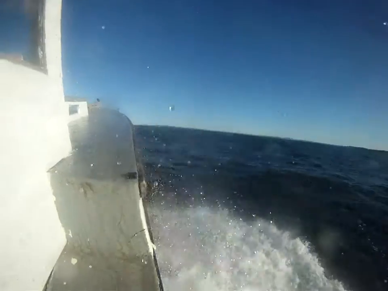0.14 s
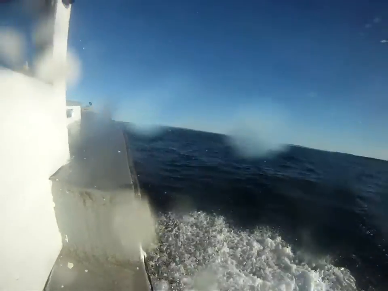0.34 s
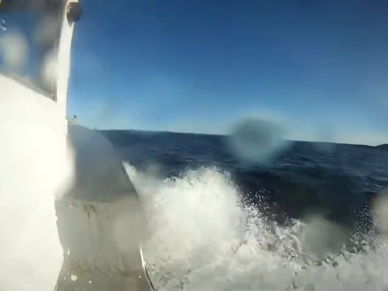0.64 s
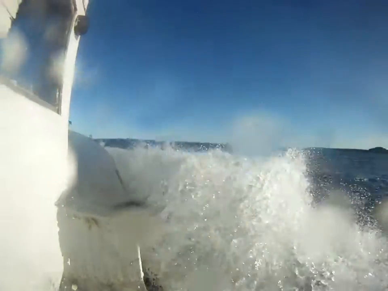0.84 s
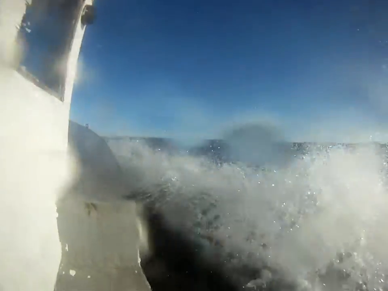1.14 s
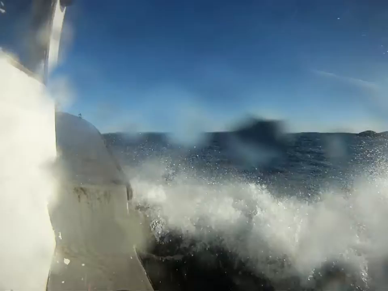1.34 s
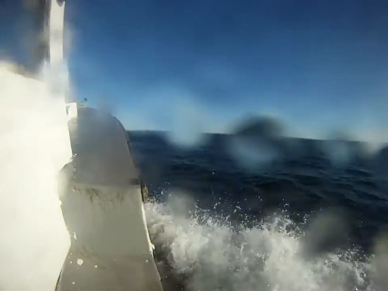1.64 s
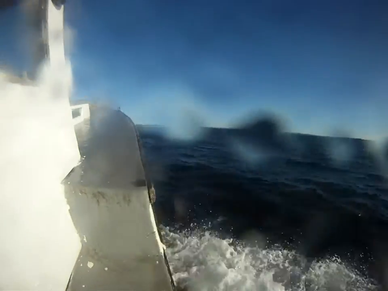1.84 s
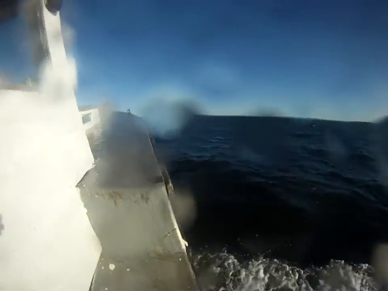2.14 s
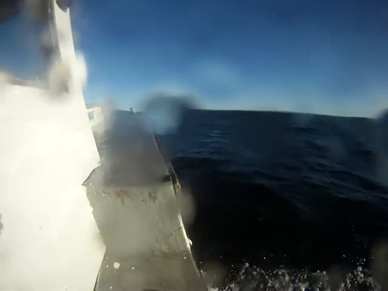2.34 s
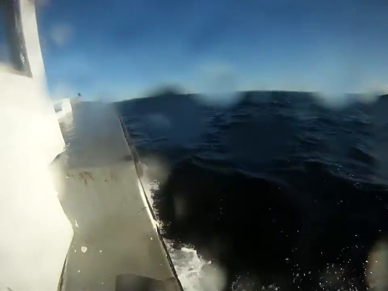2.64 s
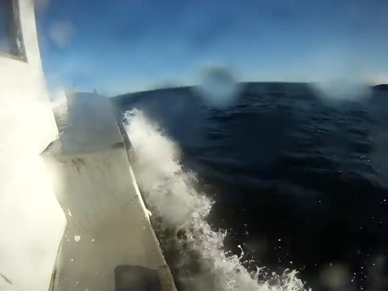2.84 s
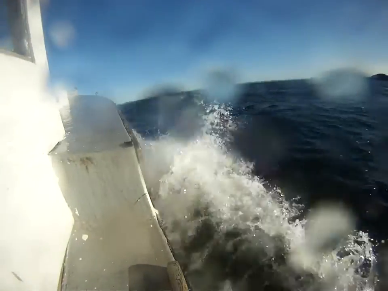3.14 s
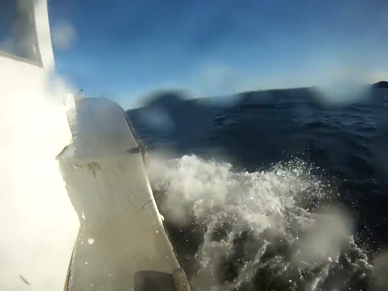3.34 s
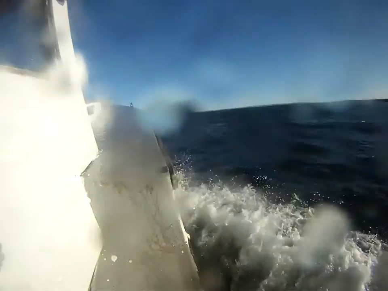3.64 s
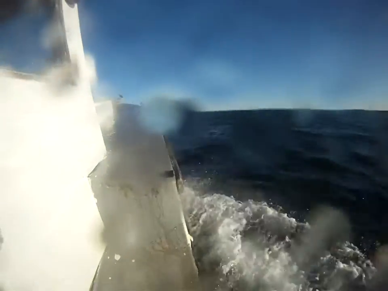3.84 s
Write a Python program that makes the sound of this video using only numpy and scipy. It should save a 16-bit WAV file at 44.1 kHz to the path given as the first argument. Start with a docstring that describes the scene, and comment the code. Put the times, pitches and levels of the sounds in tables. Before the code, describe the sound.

Water splashes from a speeding boat: loud sharp smacks at once, a lull, another hissing spray burst, then only foamy wash swelling twice. Steady engine drone beneath; muffled, boxy close microphone with gritty, harsh treble.

```python
"""Spray patters in bursts on the closed housing of a camera riding on the side of a fast motor boat.
Big drops smack the housing; it rings, rattles and thuds. Filtered noise is the wash rushing along the hull;
short rising tones are a thud under one smack, then gulps of closing air pockets. A diesel drones in sines
and clatters through the hull in repeating knocks, and wind thumps low. The camera samples slowly and holds
each sample, so everything is mirrored in the treble."""
import sys
import numpy as np
from scipy import signal
from scipy.fft import rfft, irfft, next_fast_len
from scipy.io import wavfile
from scipy.ndimage import map_coordinates

SR = 44100
rng = np.random.default_rng(int(sys.argv[2]) if len(sys.argv) > 2 else 0)


def dump_mix(stems):
    """Bounce the given channels to the path in sys.argv[1] as a 16-bit WAV at rate SR."""
    frames = np.atleast_2d(stems).T  # one column per channel
    limited = np.clip(frames, -1, 1)  # hard clip at full scale
    pcm = np.round(limited * 32767).astype(np.int16)
    wavfile.write(sys.argv[1], SR, pcm)


N = 176400  # length in samples

# Spray bursts. Each row: time in seconds, level in dB, share of single drops against steady hiss (0 to 1).
SPRAY_CURVE = [(0, -33, 0.5), (.06, -36, 0.65), (.09, -51, 0.2), (.2, -46, 0.3), (.215, -33, 0.3),
               (.27, -24.5, 0.24), (.34, -31.5, 0.9), (.375, -37.5, 0.5), (.42, -34, 0.3), (.58, -38, 0.9),
               (.64, -58, .3), (1.02, -42.5, 0.5), (1.1, -27, 0.15), (1.25, -25.5, 0.08),
               (1.33, -29.5, 0.4), (1.39, -37.5, 0.2), (1.4, -26, 0.14), (1.43, -30.5, 0.3),
               (1.437, -45, 1), (1.62, -45, 0.9), (1.7, -72, .3), (4, -80, .3)]
# Colour of drops heard in the housing. Each row: frequency in Hz, relative level in dB per Hz.
HOUSING_COLOUR = [(80, -44.5), (200, -12.5), (450, -16.5), (750, -13.5), (900, -8), (1050, -8.5),
                  (1270, -2.5), (1450, -10.5), (2020, 1), (2500, -0.5), (2900, -9.5), (3300, -12.5),
                  (3650, -6), (4200, -14), (4700, -11), (5950, -21.5), (7700, -39), (13000, -120)]
DROPS_PER_S, DROP_SPREAD_DB = 220, 0.5  # mean rate, mean of the random level added to each drop
DROP_RISE_S, DROP_FADE_S = 0.00031, 0.0017

# Wash along the hull. Each row: time in seconds, level of bass and middle in dB, level of treble in dB.
WASH_CURVE = [(0, -41, -41.5), (.5, -34.5, -51.5), (.8, -37.5, -50.5), (1.2, -39, -48), (1.65, -36.5, -47),
              (1.9, -42, -54.5), (2.2, -42.5, -59.5), (2.3, -37, -50), (2.48, -32, -42.5),
              (2.6, -37, -48.5), (2.8, -38, -53), (3.1, -38.5, -51.5), (3.26, -33.5, -44),
              (3.4, -37.5, -45.5), (3.62, -39, -51), (3.75, -40.5, -56), (4, -40, -58.5)]
# Colour of the wash. Each row: frequency in Hz, relative level in dB per Hz.
FOAM_COLOUR = [(290, -50.5), (500, -12), (590, -16), (719, -12.5), (814, -14.5), (884, -14), (981, -15.5),
               (1260, -3.5), (1480, -10), (2070, 1.5), (2540, -2), (2880, -15), (3100, -8.5), (4640, -17.5),
               (5360, -14.5), (5950, -25.5), (7740, -68), (13100, -120)]

CYCLE_HZ = 19.6  # one full firing cycle, before its slight drift
# Steady engine tones. Each row: multiple of the cycle, sine amplitude in dB before its wobble.
ENGINE_ORDERS = [(5, -59), (6, -49), (7, -60), (8, -56), (9, -51.5), (11, -52.5), (12, -53.5), (13, -56)]
WHINE_HZ, WHINE_DB = 317.3, -51  # pitch before the drift, sine amplitude before its wobble
# Firing tone. Each row: time in seconds, sine amplitude in dB before its wobble.
DRONE_CURVE = [(0, -52), (.3, -44), (.86, -39), (1.2, -48.5), (1.6, -43), (2.85, -44.5), (3.1, -48.5),
               (4, -44)]
# Colour of clatter and engine noise through the hull. Each row: frequency in Hz, relative level in dB per Hz.
HULL_COLOUR = [(210, -28), (350, -2), (438, -11), (476, -5), (505, -33), (536, -12), (756, -7.5),
               (893, -2.5), (1050, -5.5), (1470, -1), (1820, -8), (2420, -1.5), (2790, -12.5), (3140, -13),
               (4120, -35), (4860, -15.5), (5950, -35), (7740, -40), (13100, -120)]
CLATTER_DB, ENGINE_NOISE_DB = -53.5, -43
KNOCK_SPREAD_DB = -10.5  # scales the level offsets of the four knocks
# Hull panels ringing with the clatter. Each row: pitch in Hz, width in Hz, level in dB rms.
HULL_PANELS = [(1975, 50, -49), (3070, 130, -54.5), (863.5, 12, -55), (933, 21, -59)]
# Low rumble over time. Each row: time in seconds, level in dB before its wobble.
RUMBLE_CURVE = [(0.2, -60), (0.45, -41), (0.89, -47), (1.2, -44.5), (1.71, -47), (2.01, -54), (2.37, -48),
                (3.33, -48), (3.62, -47.5), (4.0, -51)]
# Colour of the low rumble. Each row: frequency in Hz, relative level in dB per Hz.
RUMBLE_COLOUR = [(15, -11), (25, 4.5), (86, 2.5), (156, -1.5), (322, -8.5), (361, -17), (500, -23),
                 (650, -66)]

# Wind buffeting. Each row: time in seconds, level of the low thumping in dB.
WIND_CURVE = [(0, -50), (.07, -48), (.25, -63), (.48, -56), (.53, -36), (.59, -36), (.64, -54),
              (1.2, -43.5), (1.42, -54), (1.6, -74), (2.9, -56), (3, -49), (3.15, -73), (3.5, -41.5),
              (3.7, -49), (4, -56)]
# Colour of the thumping. Each row: frequency in Hz, relative level in dB per Hz.
THUMP_COLOUR = [(22, 5.5), (50, -0.5), (90, -17), (200, -4), (400, -57)]

# Big drops. Each row: start in seconds, nominal peak in dB, length in seconds, mean ring pitch in Hz,
# treble in dB relative to the nominal level of the rattle.
BIG_DROPS = [(0.0039, -12.0, 0.0051, 1930.0, -5.5), (0.0076, 1, 0.0016, 1920, -19),
             (0.0282, -7.5, 0.0017, 2310.0, -18.0), (0.0327, 0, 0.0013, 2140, -20.0),
             (0.0384, -7, 0.0014, 2210, -7), (0.0675, 8.5, 0.0023, 2004, -19.5),
             (0.0744, -7.5, 0.0011, 1880.0, -26), (0.096, -23, 0.0016, 2380.0, -10.0),
             (0.1243, -4.5, 0.0016, 2200, -10), (0.1506, -14, 0.0016, 1200, -17.0),
             (0.1815, 4.5, 0.0024, 1918, -11.5), (0.21, -14.0, 0.0014, 2370, -19.0),
             (0.2162, -20, 0.0018, 2400, -11.0), (0.2194, -19.0, 0.0024, 2200.0, -8.0),
             (0.2332, -11, 0.0022, 2270, -9), (0.2364, -10.5, 0.0015, 2260, -20.0),
             (0.2527, -17, 0.0048, 2170, -3), (0.263, -14.0, 0.0014, 2210, -7),
             (0.271, -14.0, 0.0016, 2190.0, -21.0), (0.2783, -13.0, 0.002, 2010.0, -6),
             (0.288, -15, 0.0016, 2200, -10), (0.294, -12.0, 0.0031, 2030.0, -11.0),
             (0.3089, -13, 0.0012, 2270.0, -8), (0.311, -6.5, 0.0017, 2216, -16),
             (0.3282, -9.5, 0.0022, 2180, -10.0), (0.3326, -14, 0.002, 1880.0, -13),
             (0.3367, -13, 0.0017, 2200, -10.0), (0.3538, -12.5, 0.003, 2000.0, -9),
             (0.382, -11.5, 0.0025, 2350.0, -12), (0.3867, -19.0, 0.0023, 1840.0, -7.0),
             (0.4086, -20.5, 0.0016, 2150.0, -10), (0.455, -21.5, 0.0027, 2020.0, -17),
             (0.465, -18, 0.0014, 2250.0, -10), (0.5392, -16, 0.0017, 2190, -18),
             (0.544, -28, 0.0045, 2060.0, -2.5), (0.5744, -26.5, 0.0046, 2090, -5),
             (0.5886, -20.0, 0.0013, 2140, -15), (0.8764, -23, 0.0012, 2290.0, 2),
             (0.9856, -15.5, 0.0013, 2390.0, -10), (1.112, -22, 0.0015, 1890.0, -16.0),
             (1.115, -16, 0.003, 2130, -9.0), (1.1203, -15, 0.0014, 2290.0, -16),
             (1.1472, -21, 0.0013, 2470.0, -13), (1.1879, -17.5, 0.0028, 2000.0, -9.0),
             (1.202, -17, 0.0017, 2120.0, -10.0), (1.2256, -13.5, 0.0043, 2020, -11),
             (1.247, -14, 0.0017, 2320.0, -21.0), (1.255, -18, 0.0022, 2160.0, -8.0),
             (1.2765, -10, 0.0018, 2220.0, -10), (1.2816, -8.5, 0.0014, 2340.0, -20.0),
             (1.3012, -9.5, 0.0018, 2080.0, -8), (1.3207, -19.5, 0.0021, 2290.0, -12.0),
             (1.3367, -10, 0.0034, 2030, -21), (1.3817, -6.5, 0.0035, 2020, -12.5),
             (1.406, -20, 0.0013, 1910.0, -15.0), (1.415, -18.0, 0.0033, 1810.0, -9.0),
             (1.4856, -18, 0.0022, 2170, -7.5), (1.504, -18.5, 0.0039, 2250, -16),
             (1.5532, -20, 0.002, 2260.0, -13.0), (1.585, -14.5, 0.0022, 2280, -18.0),
             (1.591, -16.5, 0.0014, 2050.0, -17.0), (2.321, -33, 0.0016, 2200, 4)]
# Colour of the dull part of a smack. Each row: frequency in Hz, relative level in dB per Hz.
THUD_COLOUR = [(30, -21), (120, 8), (400, -2.5), (900, 6.5), (1300, -21), (2500, -47)]
SMACK_RISE_S, SMACK_TAIL_S, SMACK_TAIL_DB = 0.00088, 0.0032, -4
CREST_DB = 6.5  # nominal peak over the level of the rattle
RING_SHARE, RING_WANDER, RING_WANDER_S = 0.95, 0.21, 0.00062  # ring gain, pitch scatter (fraction), its time
THUD_DB, THUD_GROWS = -18.5, 0.37  # thud against rattle for a 0 dB smack, extra dB per dB of smack
KICK_DB = 9.5  # first push of the thud, as an impulse beside its unit noise

# Short low tones: a one-cycle thud under the smack at 0.15, then gulps of closing air pockets.
# Each row: start in seconds, starting pitch in Hz, peak in dB, length in cycles of that pitch.
LOW_TONES = [(0.15, 376, -15, 1.05), (0.545, 70, -33, 2), (1.19, 122, -30, 2.6), (1.342, 252, -30, 3.3)]
TONE_RISE = 0.17  # pitch climb over a tone, as a fraction

SAMPLE_HZ, EDGE_HZ, TOP_HZ = 12000, 6000, 15330  # slow sampling rate, input filter edge, top of the output
MIRROR_DB = 0.5  # lift of the mirrored treble


def amp(db):
    """Turn dB into gain."""
    return 10 ** (np.asarray(db) / 20)


def unit(x):
    """Scale to rms 1."""
    return x / np.sqrt(np.mean(x ** 2) + 1e-20)


def along(points, hz):
    """Read (Hz, value) points along a log frequency axis."""
    f, v = np.transpose(points)
    return np.interp(np.log(hz + 1), np.log(f + 1), v)


def curves(rows):
    """Draw one automation curve, a value per sample, for each column after the time."""
    s, *cols = np.transpose(rows)
    return [np.interp(np.arange(N) / SR, s, c) for c in cols]


def wobble(rate):
    """A smooth random curve with this many knots a second, 40 at most."""
    knots = rng.standard_normal(int(N * 40 / SR) + 4)
    return map_coordinates(knots, [np.arange(N) * min(rate, 40) / SR])


def filtered(x, response):
    """Multiply the spectrum of x by a response of frequency, padded against wrap-around."""
    m = next_fast_len(N + SR // 2)
    return irfft(rfft(x, m) * response(np.fft.rfftfreq(m, 1 / SR)), m)[..., :N]


def coloured(x, spectrum):
    """Pass x through a causal minimum-phase filter of energy 1 with this spectrum."""
    gain = amp(along(spectrum, np.fft.rfftfreq(8192, 1 / SR)))
    cepstrum = irfft(np.log(gain + 1e-4))
    # Folding the cepstrum onto positive time gives minimum phase
    cepstrum[1:4096] *= 2
    cepstrum[4097:] = 0
    impulse = irfft(np.exp(rfft(cepstrum)))[:4096]
    return signal.fftconvolve(x, impulse / np.linalg.norm(impulse))[:N]


def split(x):
    """Bass, middle and treble of a water sound, crossing near 1000 and 3200 Hz and adding up to x."""
    bass = filtered(x, lambda hz: 1 / (1 + (hz / 1000) ** 6))
    treble = filtered(x, lambda hz: 1 - 1 / (1 + (hz / 3200) ** 10))
    return bass, x - bass - treble, treble


def spray():
    """Drops patter at random as short noise bursts of slightly different sizes, mixed into a steadier rush."""
    level_db, share = curves(SPRAY_CURVE)
    share = np.clip(share, 0, 1)
    draw = rng.random((2000, 2))
    times = np.cumsum(-np.log(draw[:, 0])) / DROPS_PER_S * SR
    sizes = amp(-DROP_SPREAD_DB * np.log(draw[:, 1]))
    hits = np.bincount(times.astype(int), sizes, N)[:N]
    t = np.arange(SR // 40) / SR
    drop_shape = (1 - np.exp(-t / DROP_RISE_S)) * np.exp(-t / DROP_FADE_S)
    drops = unit(signal.fftconvolve(hits, drop_shape)[:N])
    rush = amp(0.53 * wobble(25.3))
    gate = np.sqrt(1 - share) * rush + np.sqrt(share) * drops
    return coloured(amp(level_db) * gate * rng.standard_normal(N), HOUSING_COLOUR)


def wash():
    """Foam rushes along the hull as fluttering noise, brighter when the bow digs in."""
    body_db, treble_db = curves(WASH_CURVE)
    noise = rng.standard_normal(N)
    flutter = amp(0.82 * wobble(35.09))
    bass, middle, treble = split(coloured(noise * flutter, FOAM_COLOUR))
    return amp(body_db) * (bass + middle) + amp(treble_db) * unit(treble)


def knock_train(phase):
    """Four decaying noise knocks of different sizes, repeated the same way every firing cycle."""
    noise = rng.standard_normal(2048)
    decay = np.tile(np.exp(-np.arange(512) / 150), 4)
    sizes = np.repeat(amp(KNOCK_SPREAD_DB * np.array([1, -1, .5, -.5])), 512)
    pattern = noise * decay * sizes
    return pattern[(phase % 1 * 2048).astype(int)]


def engine():
    """Sines follow the drifting firing cycle; knocks ring hull and panels over pulsing noise and rumble."""
    phase = np.cumsum(CYCLE_HZ * (1 + 0.0017 * wobble(1.5))) / SR  # in cycles
    tones = np.zeros(N)
    for order, db in ENGINE_ORDERS:
        level = amp(db + 1.4 * wobble(9))
        tones += level * np.sin(2 * np.pi * (round(order) * phase + rng.random()))
    whine = amp(WHINE_DB + 1.5 * wobble(2.52)) * np.sin(2 * np.pi * WHINE_HZ / CYCLE_HZ * phase)

    knocks = knock_train(phase)
    clatter = amp(CLATTER_DB) * unit(coloured(knocks, HULL_COLOUR))

    # Noise and rumble swell two and four times a cycle
    beat = 1 + 0.18 * np.cos(2 * np.pi * 2 * phase) + 0.1 * np.cos(2 * np.pi * 4 * phase)
    noise_level = amp(ENGINE_NOISE_DB + 0.27 * wobble(7.9))
    noise = noise_level * coloured(rng.standard_normal(N) * beat, HULL_COLOUR)
    rumble_level = amp(curves(RUMBLE_CURVE)[0] + 2.3 * wobble(24.96))
    rumble = rumble_level * coloured(rng.standard_normal(N) * beat, RUMBLE_COLOUR)

    firing = amp(curves(DRONE_CURVE)[0] + 1.3 * wobble(12.2)) * np.sin(2 * np.pi * 4 * phase)
    shake = knocks + 0.46 * rng.standard_normal(N)
    panels = np.zeros(N)
    for pitch, width, db in HULL_PANELS:
        panels += amp(db) * unit(filtered(shake, lambda hz: 1 / (1 + (2 * (hz - pitch) / width) ** 2)))
    return firing + panels + tones + whine + clatter + noise + rumble


def wind():
    """Wind buffets the housing as low noise with a lumpy level."""
    level_db, = curves(WIND_CURVE)
    lumps = amp(1.4 * wobble(13))
    return amp(level_db) * unit(lumps * coloured(rng.standard_normal(N), THUMP_COLOUR))


def smacks():
    """Each big drop strikes the housing, which rings unsteadily and rattles for a few ms, thuds and trickles off."""
    t = np.arange(SR // 20) / SR
    count = len(t)
    thud_gate, middle_gate, treble_gate = gates = np.zeros((3, N + count))
    kicks, ring = np.zeros(N), np.zeros(N + count)
    scatter = filtered(rng.standard_normal(N), lambda hz: np.exp(-(2 * hz * RING_WANDER_S) ** 2))
    wander = 1 + RING_WANDER * unit(scatter)
    rise = np.minimum(t / SMACK_RISE_S, 1)
    for s, db, length, pitch, treble_db in BIG_DROPS:
        start = round(s * SR)
        here = slice(start, start + count)
        blow = np.exp(-(t / max(length, 3e-4)) ** 3)
        shape = rise * (blow + amp(SMACK_TAIL_DB) * np.exp(-t / SMACK_TAIL_S))
        rattle_db = db - CREST_DB
        thud_gate[here] += amp(rattle_db + THUD_DB + THUD_GROWS * db) * shape
        middle_gate[here] += amp(rattle_db) * shape
        treble_gate[here] += amp(rattle_db + treble_db) * shape
        turns = pitch * np.cumsum(wander[here]) / SR
        ring[here] -= amp(db) * rise * blow * np.sin(2 * np.pi * turns)
        kicks[round((s + SMACK_RISE_S) * SR)] = -amp(KICK_DB)

    # Random signs make noise of constant size; the three bands share it
    rattle = np.sign(rng.standard_normal(N)) * gates[:, :N]
    thud = coloured(rattle[0] + kicks * thud_gate[:N], THUD_COLOUR)
    middle = split(coloured(rattle[1], HOUSING_COLOUR))[1]
    # Dividing by the treble of plain housing noise sets the treble level by its gate
    treble_share = np.std(split(coloured(rng.standard_normal(N), HOUSING_COLOUR))[2])
    treble = split(coloured(rattle[2], HOUSING_COLOUR))[2] / treble_share
    return thud + RING_SHARE * ring[:N] + middle + treble


def low_tones():
    """A one-cycle thud under a smack, then gulps of air pockets: sines under a half-sine swell, climbing a little."""
    out = np.zeros(N + SR)
    for s, pitch, db, cycles in LOW_TONES:
        u = np.arange(int(cycles / pitch * SR)) * pitch / SR / cycles  # 0 to 1 over the tone
        tone = np.sin(2 * np.pi * cycles * u * (1 + TONE_RISE * u / 2))
        out[round(s * SR):][:len(u)] -= amp(db) * np.sin(np.pi * u) * tone
    return out[:N]


def scene():
    """All sources summed at the one microphone."""
    return (spray() + smacks() + wash() + low_tones() + engine() + wind())[None]


def record(dry):
    """Input filter and soft overload, then slow sample-and-hold, which mirrors the sound upward; band limit."""
    band = filtered(dry, lambda hz: 1 / (1 + (hz / EDGE_HZ) ** 40))
    clipped = band / (1 + np.abs(band / 1.04) ** 6) ** (1 / 6)
    clipped = filtered(clipped, lambda hz: hz < SAMPLE_HZ / 2)
    # A cosine at the sampling rate makes the mirror images on both sides of it
    carrier = np.cos(2 * np.pi * SAMPLE_HZ * np.arange(N) / SR)
    sampled = clipped * (1 + 2 * amp(MIRROR_DB) * carrier)
    # Holding each sample dulls the treble as a sinc
    held = np.clip(filtered(sampled, lambda hz: np.sinc(hz / SAMPLE_HZ)), -1, 1)
    return filtered(held, lambda hz: hz < TOP_HZ)


dry = scene()
out = record(dry)
dump_mix(out)
```